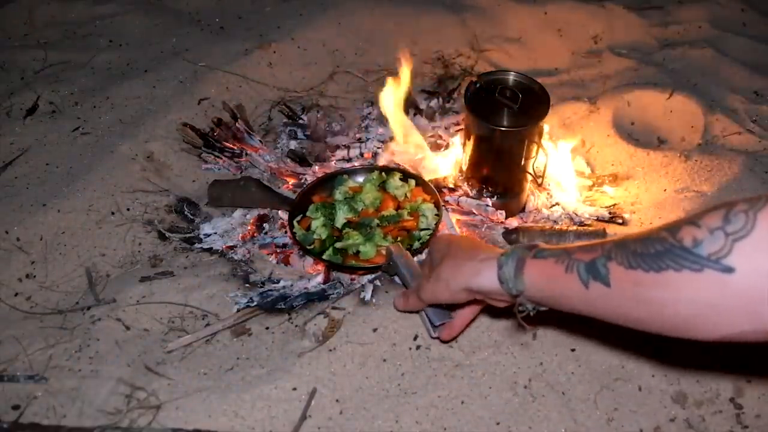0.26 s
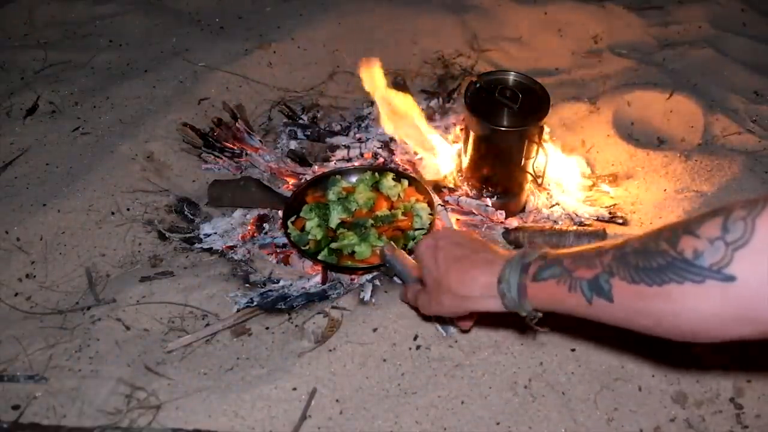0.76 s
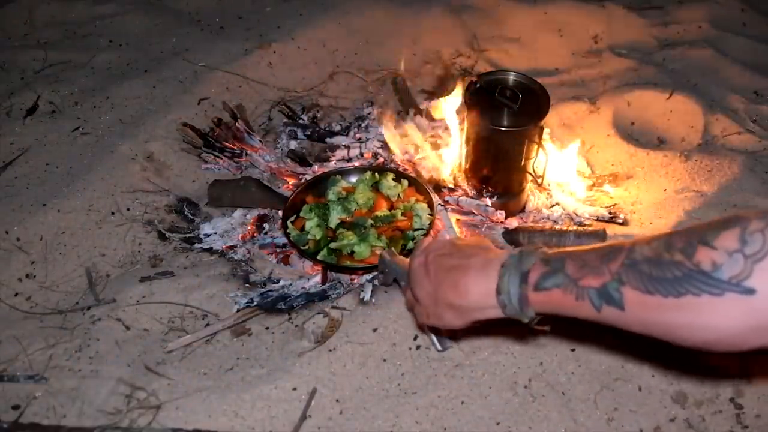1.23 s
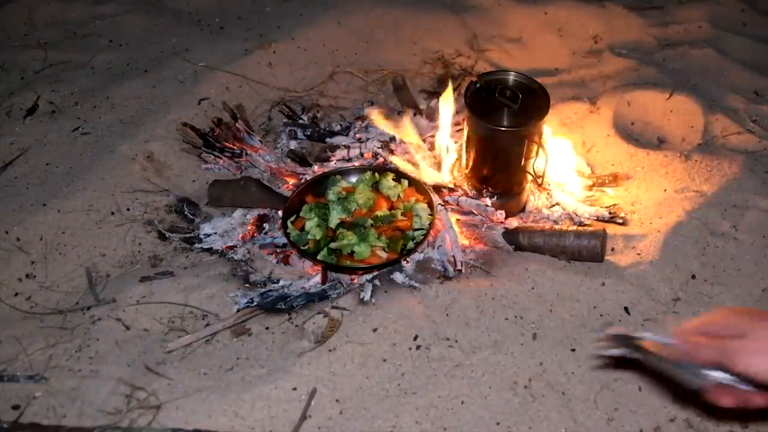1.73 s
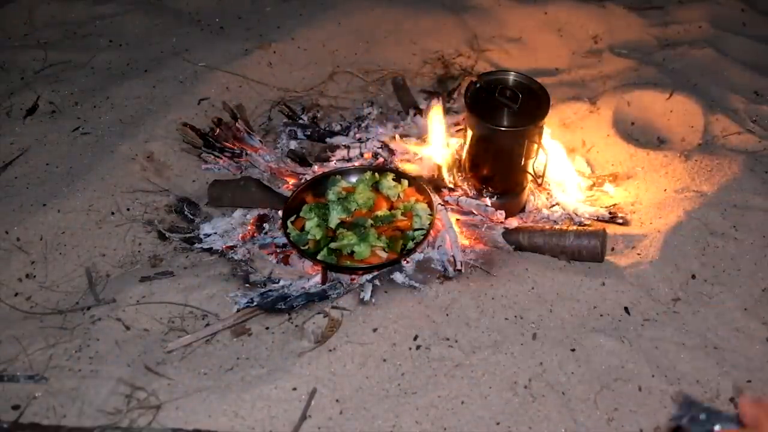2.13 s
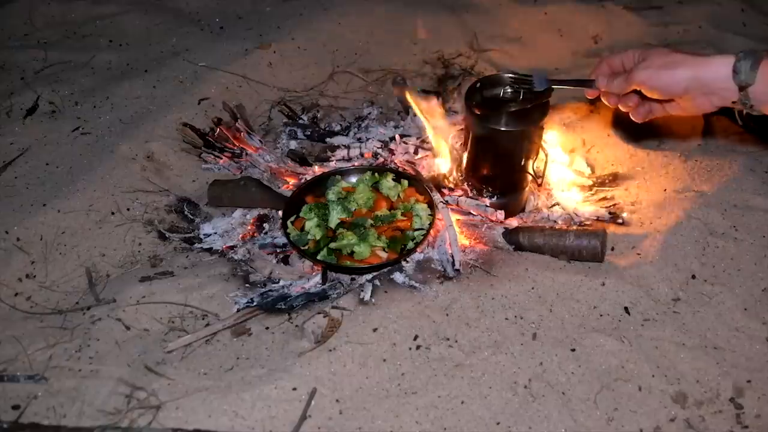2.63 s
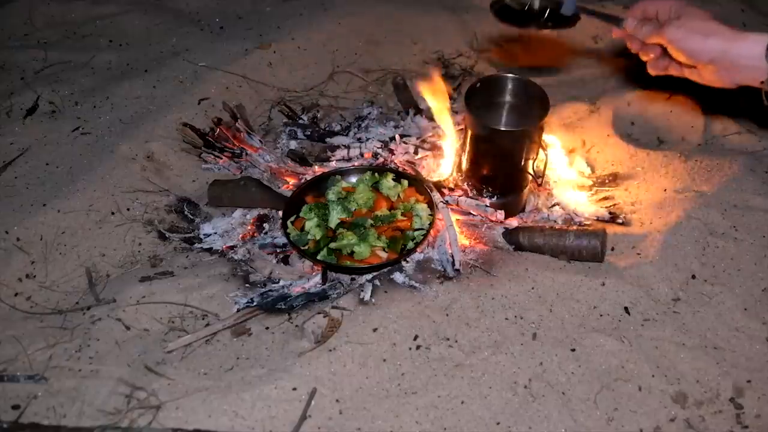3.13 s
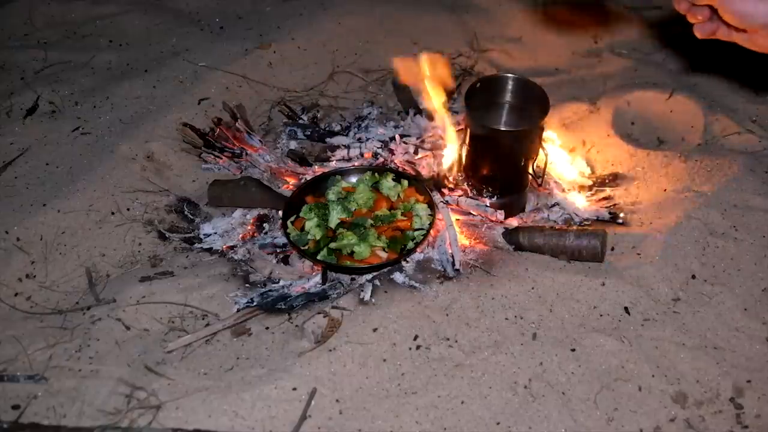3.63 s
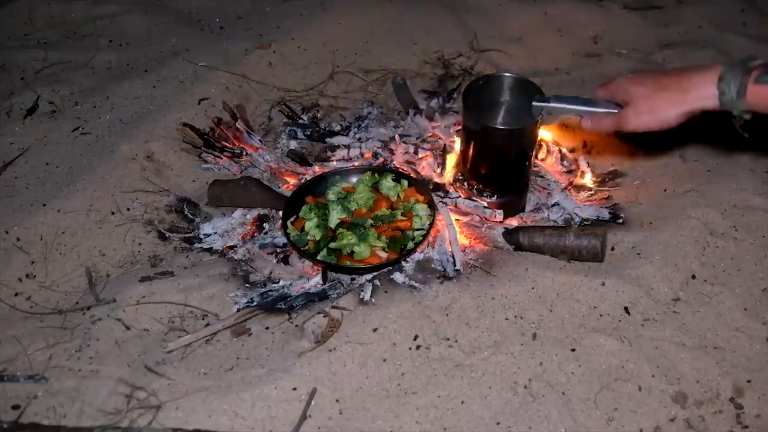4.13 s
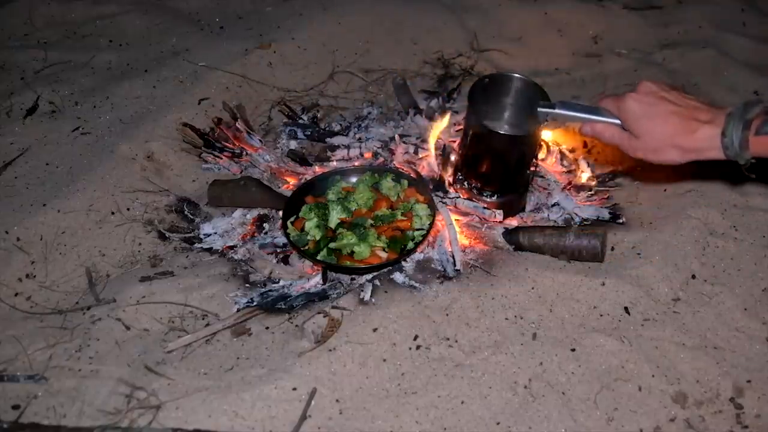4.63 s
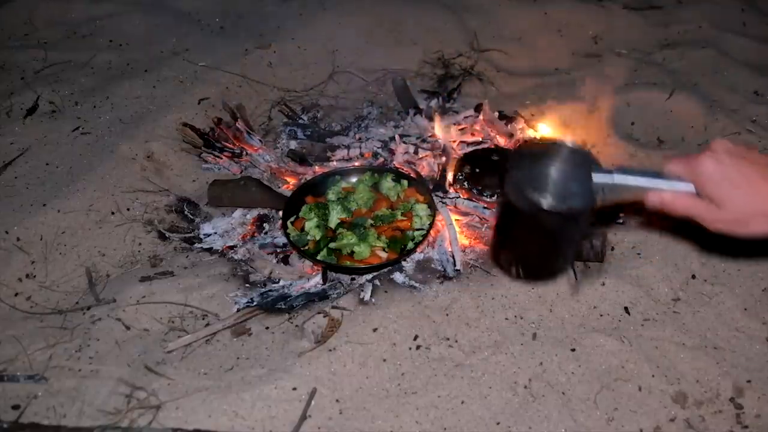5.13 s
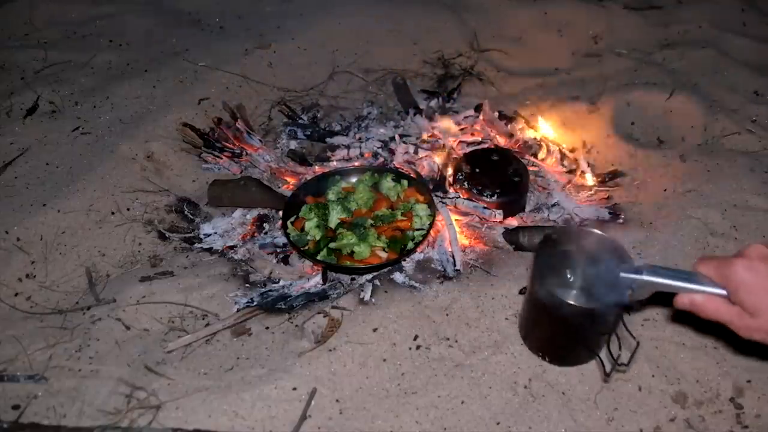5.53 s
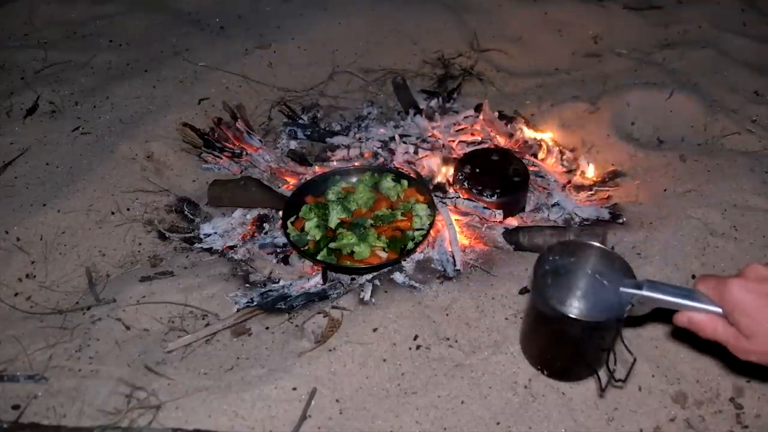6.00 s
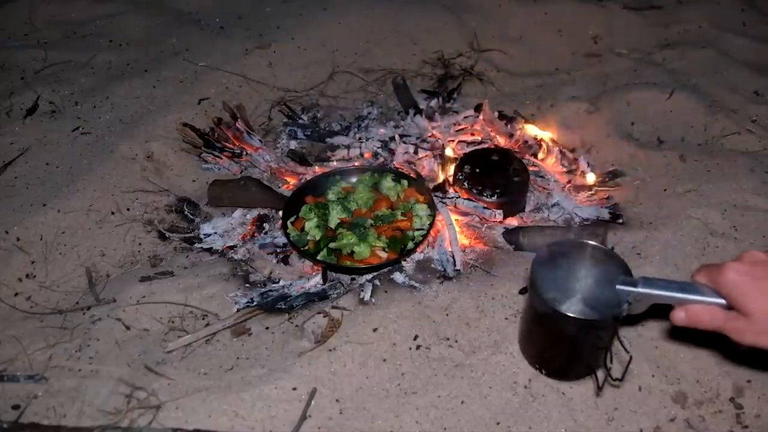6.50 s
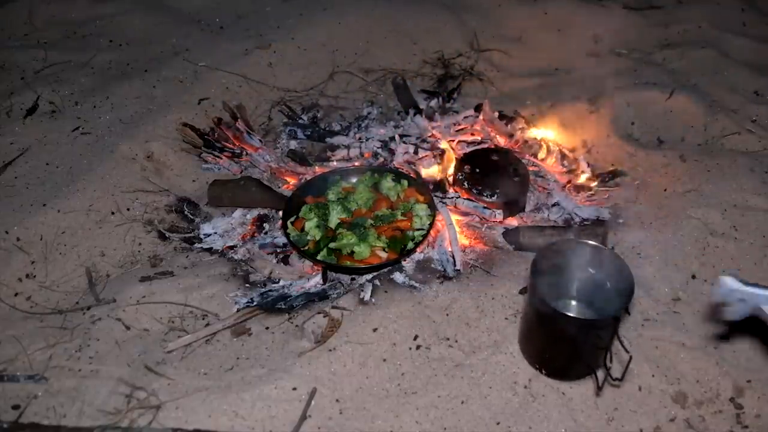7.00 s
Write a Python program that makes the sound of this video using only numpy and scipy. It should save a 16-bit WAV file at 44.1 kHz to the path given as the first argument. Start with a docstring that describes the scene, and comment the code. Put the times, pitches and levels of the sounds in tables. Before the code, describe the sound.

Outdoors at night, close stereo microphones catch low flame flutter, a fast pulsing cricket and distant insects. Vegetables fry very softly while a metal gripper ticks the pan. A brief clinking clamp on a thin lid brings a sudden louder sizzle, which swells again with sharp spits when a full pot is gripped and lifted. The pot lands with short gritty thuds and scrapes in sand, while the sizzle continues.

```python
"""A campfire on sand at night: insects trill, flames flutter and vegetables fry softly in a pan on the coals.
A metal gripper knocks the pan, then lifts the lid off a pot; a louder sizzle starts, which swells and spits
as the pot is gripped and lifted from the fire. The pot is then set down and ground into the sand.
Flames, frying and scraping are shaped noise, knocks and spits are short rings, and the cricket is a
pulsing tone over narrow bands of noise from farther insects."""
import sys
import numpy as np
from scipy import signal
from scipy.fft import rfft, irfft
from scipy.io import wavfile
from scipy.ndimage import uniform_filter1d

SR = 44100
rng = np.random.default_rng(int(sys.argv[2]) if len(sys.argv) > 2 else 0)


def dump_mix(stems):
    """Bounce the given channels to the path in sys.argv[1] as a 16-bit WAV at rate SR."""
    frames = np.atleast_2d(stems).T  # one column per channel
    limited = np.clip(frames, -1, 1)  # hard clip at full scale
    pcm = np.round(limited * 32767).astype(np.int16)
    wavfile.write(sys.argv[1], SR, pcm)


N = 320166
TIME = np.arange(N) / SR  # seconds

# Colour of the flames and night air, before one overall level is set: pitch_hz, level_db
AIR_COLOUR = [(20, -19), (50, -5.5), (110, -1.5), (200, -0.5), (400, -3), (700, -6.5), (1100, -10),
              (1500, -11), (2600, -19.5), (5000, -27.5), (10000, -43), (16000, -41)]
# Extra colour of the left-right difference in that air: pitch_hz, level_db
AIR_SIDE_COLOUR = [(30, -5), (120, -3), (300, -2.5), (800, 3), (2000, 7), (16000, 5)]

# Dull low knocks near 1 kHz; the first goes with a gripper knock on the pan: start_s, peak_db
DULL_KNOCKS = [(1.211, -24.5), (4.4256, -16.5), (7.15, -25.5)]
# Short, broad rings of those knocks: pitch_hz, width_hz, level_db
DULL_KNOCK_MODES = [(764, 220, 0), (1070, 300, 11), (1420, 350, 1), (2300, 750, -23)]

# The pot meeting wood and sand: start_s, level_db, rise_s, decay_s,
# place (0 = thud of its base, 1 = scrape of its edge)
POT_TOUCHES = [(5.584, -22, 0.00073, 0.0051, 0.45), (5.614, -17, 0.0012, 0.0022, 0.3),
               (5.635, -33.5, 0.053, 0.034, .7), (5.93, -26.5, 0.0077, 0.013, 0.6),
               (5.945, -15, 0.0014, 0.0042, 0.38), (5.952, -22.5, 0.003, .005, 0.8),
               (5.9605, -19, 0.0013, 0.0015, 0.73), (5.9865, -22, .0005, 0.011, 1),
               (6.019, -20.5, 0.0063, 0.0078, .65), (6.045, -36, .003, 0.0047, .4),
               (6.301, -27, 0.0022, .003, 0.36), (6.34, -28, 0.026, 0.039, 0.65),
               (6.3637, -14, 0.0012, 0.0035, .02), (6.67, -30, 0.044, 0.072, 0.57)]
# Rings of the full pot, damped by water and sand: pitch_hz, width_hz, base_db, edge_db
POT_MODES = [(345, 180, 0, -25), (1170, 55, -1.5, -16), (1385, 250, 11.5, -2.5), (2940, 270, 1, 6.5),
             (4530, 360, -7, 1), (5100, 340, -14, -15), (6000, 240, -14, -6), (8700, 1300, -16, -27)]
# Hard blows of the full pot that thump the ground: start_s, peak_db
THUMPS = [(5.617, -37), (5.947, -26.5), (6.02, -36), (6.3637, -22)]
# The dead thud of packed sand: pitch_hz, width_hz, level_db
GROUND_MODES = [(150, 120, 4), (343, 220, -5)]

# Gripper on the pan: start_s, level_db, rise_s, decay_s,
# place (0 = dull knock on the wall, 1 = bright slip on the rim)
PAN_TOUCHES = [(.2866, -27.5, 0.00012, 0.0034, 0.019), (.593, -39.5, 0.0019, 0.0042, 0.37),
               (.815, -48, 0.036, 0.014, 1), (.847, -26, 0.00063, 0.003, 0.35),
               (1.140, -27.5, 0.0045, 0.006, 0.49), (1.175, -41, 0.0083, 0.027, 0.85),
               (1.210, -38, 0.0032, 0.0058, 0.057)]
# Rings of the loaded pan: pitch_hz, width_hz, wall_db, rim_db
PAN_MODES = [(744, 140, -6.5, -4), (1090, 180, 1, -10), (1873, 55, 12, -4), (2040, 110, 2, -12),
             (3000, 890, 1, -3), (3670, 200, -1, -21), (4080, 280, -19, -2), (7900, 1100, 3, -2),
             (9800, 530, -20, -10), (11100, 430, -28, -14)]
# Gripper on the lid: start_s, level_db, rise_s, decay_s,
# place (0 = clamped at the edge, 1 = dragged over the pot's lip)
LID_TOUCHES = [(2.3665, -20.5, 0.00023, 0.0043, .02), (2.371, -25.5, 0.0012, 0.0032, .05),
               (2.388, -22, 0.0012, 0.002, .1), (2.398, -23.5, 0.00059, 0.0029, 0.4),
               (2.44, -40.5, 0.039, 0.039, 0.55), (2.477, -33, 0.0011, 0.0031, 0.48),
               (2.487, -29, .002, 0.0083, 0.96), (2.521, -33.5, 0.0017, .003, .8)]
# Rings of the thin steel lid: pitch_hz, width_hz, edge_db, dragged_db
LID_MODES = [(1003, 45, 4, -28), (1080, 54, 8, -27), (1334, 62, -3, -5), (1470, 34, -6, -2),
             (2060, 150, 10.5, -1), (2170, 150, -4, -17), (2520, 25, -8, -13), (2840, 40, 7, -8),
             (2740, 26, -3, -11), (3248, 23, -16, 4), (3376, 15, 6, -7), (3300, 29, -15, -15),
             (4700, 10, -13, -6), (5520, 11, -20, -7), (5550, 10, -22, -7), (5910, 17, -1, -9),
             (7700, 20, -10, -19), (7800, 26, -4, -20), (8830, 7, -26, -8)]

# Sizzle of pan and coals, before a 1 dB cut; it steps up when the lid is clamped
# and again when the pot is gripped: start_s, level_db
SIZZLE_LEVEL = [(0, -53), (1.0, -53.5), (1.6, -56.5), (1.85, -52.5), (2.35, -52.5), (2.39, -42.5),
                (3.1, -43.5), (3.4, -40.5), (4.12, -43.5), (4.14, -38), (4.3, -36.5), (4.55, -38.5),
                (5.15, -34), (5.5, -35.5), (6.0, -34.5), (6.35, -36), (6.65, -34.5), (7.26, -37)]
# Colour of the sizzle, before its treble varies: pitch_hz, level_db
SIZZLE_COLOUR = [(200, -8), (800, -9.5), (1300, -3), (1900, 1), (3000, 1), (4400, -0.5), (5500, -2.5),
                 (6400, -6.5), (7400, -1.5), (9200, 0.5), (10800, -4), (12500, -3), (15700, -11)]
# Treble gain of the sizzle: dullest below the first level, then rising along
# the line through the later points: level_db, treble_db
TREBLE_BY_LEVEL = [(-51, -23), (-57, -11), (-38.5, -1), (-29.5, -1.5)]
# Steps per second, and typical size, of the level surges and the treble wavering
SURGE_PER_S, SURGE_DB = 12, 0.29
WAVER_PER_S, TREBLE_WAVER_DB = 96, 2.0

# The loudest spits of bursting drops, before a 1.5 dB cut: start_s, peak_db, pitch_hz,
# damping (bandwidth over pitch, no unit)
SPITS = [(.3168, -32, 9100, .8), (.6322, -31, 11200, 2.5), (1.3471, -32.5, 7700, .4),
         (2.579, -17, 2800, 1.5), (2.5938, -16, 2500, 2.3), (2.6976, -13, 3280, 0.36),
         (2.9673, -19.5, 3000, 2.3), (3.2534, -12, 4000, 2.3), (3.3016, -16, 2730, 1.9),
         (3.3454, -12.5, 5100, 4.7), (3.4362, -10.5, 4500, 3.2), (3.6778, -16, 3800, 3.8),
         (4.1353, -18, 6300, 3.5), (4.2731, -8.5, 4200, 2.1), (4.3036, -9, 2730, 3.9),
         (4.399, -12.5, 6300, 8.2), (4.7229, -8, 4000, 3.5), (4.7722, -7.5, 5500, 3),
         (4.7945, -7, 3800, 2.3), (4.8913, -14.5, 4640, 2.1), (5.0068, -13, 2800, 1.4),
         (5.0718, -10.5, 3100, 1.5), (5.088, -11, 4200, 3.5), (5.1644, -7, 4500, 1.3),
         (5.17, -12, 3100, 2.1), (5.2131, -11, 3900, 4.4), (5.385, -6, 7440, 10), (5.6215, -4, 5200, 1.9),
         (5.7037, -4.5, 8300, 4.6), (5.7555, -4, 9600, 2.2), (6.076, -12.5, 3400, 2.1),
         (6.426, -14, 7340, 4.2), (6.8352, -6, 6000, 7), (6.9166, -10, 2820, 1.3), (6.9627, -10, 4770, 3.3),
         (7.2253, -7, 3900, 2.3)]
# Lesser spits come more often as the sizzle grows: level_db, rate_per_s
SPIT_RATE_BY_LEVEL = [(-51, .1), (-43.5, 9), (-34, 24)]
# Their peak above the tabled sizzle level, before the same cut, and its range either way
SPIT_OVER_DB, SPIT_RANGE_DB = 20.5, 3.5
# Their middle pitch, its range either way in octaves, and their bandwidth over pitch
SPIT_HZ, SPIT_OCTAVES, SPIT_DAMPING = 4500, 1.17, 1.85
# Left minus right of all spits, and its spread from drop to drop
SPIT_PAN_DB, SPIT_PAN_SPREAD_DB = 0.5, 3

# Width heard by the microphone pair: pitch_hz, side_db (gain of the left-right difference)
MIC_WIDTH = [(100, 1.5), (300, -0.5), (600, -3.5), (1400, -9.5), (2400, -8), (4500, -1), (15000, -0.5)]
# Left minus right of the microphone pair: pitch_hz, difference_db
MIC_BALANCE = [(2400, 0), (5000, 1), (9000, 1.5), (12500, -0.5)]
TOP_HZ = 15900  # the recorder's upper limit


def undb(db):
    """Turn decibels into a gain."""
    return 10 ** (np.asarray(db) / 20)


def unit(x):
    """Scale a sound to an average strength (rms) of 1."""
    return x / np.sqrt(np.mean(x ** 2))


def follow(x, points):
    """Read a table of (x, y) points joined by straight lines."""
    return np.interp(x, *np.transpose(points))


def walk(rate):
    """Wander randomly: `rate` new levels a second, smoothed twice, with an rms near 1."""
    hold = max(int(SR / rate), 2)
    steps = np.repeat(rng.standard_normal(N // hold + 1), hold)
    smooth = uniform_filter1d(uniform_filter1d(steps, hold), hold)
    return unit(smooth[:N])


def convolve(x, response):
    """Start one copy of the response at every sample of the sound; rows are channels."""
    return signal.fftconvolve(np.atleast_2d(x), np.atleast_2d(response), axes=1)[:, :x.shape[-1]]


def colour(x, points):
    """Make pitches louder or softer through (Hz, dB) points, without any sound ahead of time."""
    hz, db = np.transpose(points)
    size = 4096
    bin_hz = np.arange(size // 2 + 1) * SR / size
    log_gain = np.log(undb(np.interp(np.log(bin_hz + 1), np.log(hz), db)))
    # folding the cepstrum forward in time gives the filter that answers soonest
    cepstrum = irfft(log_gain)
    cepstrum[1:size // 2] *= 2
    cepstrum[size // 2 + 1:] = 0
    return convolve(x, irfft(np.exp(rfft(cepstrum))))


def high_pass(x, hz, order=2):
    """Cut the low pitches gently."""
    return signal.sosfilt(signal.butter(order, hz, "high", fs=SR, output="sos"), x)


def band(x, hz, width_hz):
    """Keep the pitches around one resonance, with gain 1 at its centre."""
    g, k = np.tan(np.pi * hz / SR), width_hz / hz
    top = [g * k, 0, -g * k]
    bottom = [1 + g * k + g * g, 2 * (g * g - 1), 1 - g * k + g * g]
    return signal.lfilter(top, bottom, x)


def stereo(pair, side_db):
    """Use two unrelated sounds as the middle and the left-right difference."""
    return pair[0] + undb(side_db) * pair[1] * np.array([[1], [-1]])


def panned(db):
    """Give left and right gains for a level difference."""
    return undb(np.array([[db], [-db]]) / 2)


def ring(x, modes):
    """Ring a body of (Hz, width Hz, dB) modes; wider modes die sooner, white noise keeps its level."""
    t = TIME[:SR // 2]
    response = 0
    for hz, width, db in modes:
        fade = np.exp(-np.pi * width * t)
        response = response + undb(db) * np.sqrt(width) * fade * np.cos(2 * np.pi * hz * t)
    # a small body radiates little below its lowest mode
    response = high_pass(response, .8 * modes[0][0])
    return convolve(x, response / np.linalg.norm(response))


def strike(blows, modes):
    force = np.zeros(N)
    for start_s, peak_db in blows:
        force[int(start_s * SR)] += undb(peak_db)
    sound = ring(force, modes)
    return sound / np.abs(sound).max() * force.max()


def contact(start_s, level_db, rise_s, decay_s):
    """Shape the force of one touch: it builds up, then dies away."""
    t = TIME - start_s
    fall = np.where(t < 0, (t / rise_s) ** 2, t / decay_s)
    return undb(level_db) * np.exp(-np.minimum(fall, 60))


def grit(spread_db):
    """Make dense tiny slips of uneven size under a steady push, in two unrelated rows."""
    slips = rng.standard_normal((2, N)) * undb(spread_db * rng.standard_normal(N))
    # evening out over 2 ms keeps the push steady
    return slips / np.sqrt(uniform_filter1d(slips ** 2, size=90))


def touch(touches, modes, grain_db, soft_hz, side_db):
    """Ring a metal body through tiny slips; the place of contact decides which modes answer."""
    forces = np.array([contact(*row[:4]) for row in touches])
    place = np.array([row[4] for row in touches])
    slips = grit(grain_db)
    # a broad, blunt contact pushes too slowly to reach the highest pitches
    blunt = signal.sosfilt(signal.butter(2, soft_hz, fs=SR, output="sos"), slips)
    dull_modes = [(hz, width, db) for hz, width, db, _ in modes]
    bright_modes = [(hz, width, db) for hz, width, _, db in modes]
    dull = ring((1 - place) @ forces * blunt, dull_modes)
    bright = ring(place @ forces * slips, bright_modes)
    return stereo(dull + bright, side_db)


def burst(hz, damping, scatter_db, scatter_s):
    """Burst one drop: a snap of a cycle or two, scattered differently to each ear by wood and pan."""
    t = TIME[:SR // 80]
    scatter = rng.standard_normal((2, len(t))) * np.exp(-t / scatter_s) * undb(scatter_db)
    click = (t == 0) + scatter
    snap = band(band(click, hz, hz * damping), hz, hz * damping)
    return high_pass(snap, 700)


def air():
    """Low flutter of the flames in open night air: coloured noise whose level wavers slightly."""
    mid, side = colour(rng.standard_normal((2, N)), AIR_COLOUR)
    sound = stereo([mid, colour(side, AIR_SIDE_COLOUR)[0]], side_db=1.5)
    return unit(sound) * undb(-47.5 + 0.36 * walk(5.9))


def tone_noise(hz, width_hz):
    """A pitch blurred by many callers and by distance, as two unrelated rows of narrow noise."""
    return unit(band(band(rng.standard_normal((2, N)), hz, width_hz), hz, width_hz))


def insects():
    """A cricket trills by fast wing strokes, a far chorus swells evenly, a high buzz rises for a second."""
    beat = 14.2 * TIME + 0.17 * walk(4.9)  # wing strokes so far, slightly uneven
    stroke = (.5 + .5 * np.cos(2 * np.pi * beat)) ** 6.1
    # the pitch sags through each wing stroke
    pitch_hz = 2030 - 18 * np.sin(2 * np.pi * beat) + 8 * walk(40)
    tone = np.sin(2 * np.pi * np.cumsum(pitch_hz) / SR)
    trill = undb(-49.5) * stroke * undb(2 * walk(9.4)) * tone
    swell = np.cos(2 * np.pi * (TIME - .1) / .258)  # one swell every 0.258 s
    chorus = tone_noise(1898, 156) * undb(-55.5 + 3.0 * swell)
    far = tone_noise(2027, 310) * undb(-57.5) + tone_noise(5080, 700) * undb(-69.5)
    buzz_db = np.interp(TIME, [.5, .7, 1.55, 1.8], [-77.0, -71, -71, -77])
    buzz = tone_noise(6580, 300) * undb(buzz_db)
    return trill + stereo(chorus + far + buzz, side_db=4)


def charcoal():
    """Charcoal grates under the sliding pan: many tiny slips ring broad, short modes."""
    push = contact(start_s=0.392, level_db=-45, rise_s=0.037, decay_s=0.034)
    charcoal_modes = [(2380, 1300, 11), (3500, 430, 12.0), (4150, 460, -20)]  # Hz, width Hz, dB
    slide = ring(push * grit(spread_db=-1), charcoal_modes)
    return stereo(band(slide, 3500, 8200), side_db=-13)


def dull_knocks():
    """Single blows ring broad modes near 1 kHz that die at once."""
    return strike(DULL_KNOCKS, DULL_KNOCK_MODES)


def pot():
    """Sand grinds under the pot and rings its wall; hard blows also thump the ground."""
    grinding = touch(POT_TOUCHES, POT_MODES, grain_db=3, soft_hz=7140, side_db=-3)
    return grinding + strike(THUMPS, GROUND_MODES)


def gripper():
    """Steel jaws knock the pan, then clamp the lid; each rings at its own pitches."""
    pan = touch(PAN_TOUCHES, PAN_MODES, grain_db=7.5, soft_hz=5500, side_db=-6)
    lid = touch(LID_TOUCHES, LID_MODES, grain_db=0.5, soft_hz=8200, side_db=-6)
    return pan + lid


def bubbles(flurry, sizes=16):
    """Thousands of tiny bubbles of many sizes burst at random, more often in a flurry."""
    crackle = 0
    for k, hz in enumerate(np.geomspace(2200, 13000, sizes)):
        chance, strength = rng.random(N), rng.exponential(size=N)
        # about 110 bursts a second for each size
        pops = (chance < 110 * flurry / SR) * undb(5.2 * np.minimum(strength, 4.5))
        side = 1.5 * (-1) ** k  # sizes lean left and right in turn, in dB
        shape = burst(hz, damping=1.4, scatter_db=-17, scatter_s=.0008) * panned(side)
        crackle = crackle + convolve(pops, shape)
    return crackle


def sizzle():
    """Bursting bubbles over a fine steam hiss, in quick flurries, with surging level and wavering treble."""
    level_db = follow(TIME, SIZZLE_LEVEL) + SURGE_DB * walk(SURGE_PER_S)
    treble_db = follow(level_db, TREBLE_BY_LEVEL) + TREBLE_WAVER_DB * walk(WAVER_PER_S)
    flurry = undb(1.8 * walk(45))
    crackle = bubbles(flurry)
    hiss = stereo(rng.standard_normal((2, N)), side_db=-4) * np.sqrt(flurry)
    # a gentle fry is mostly hiss; the fiercer it is, the more it crackles, up to a limit
    crackle_db = np.minimum(0.65 * (level_db + 27.5), 2)
    mix = unit(crackle) * undb(crackle_db) + undb(-6) * unit(hiss)
    sound = colour(mix, SIZZLE_COLOUR)
    treble = high_pass(sound, 6700, order=1)
    sound = high_pass(sound + (undb(treble_db) - 1) * treble, 190)
    return unit(sound) * undb(level_db - 1.0)


def lesser_spits(count=400):
    """Drops burst at random, more often and harder in a fierce sizzle; rows like those of SPITS."""
    slot_s = N / SR / count  # each short slot of time may hold one spit
    chance, when, size, pitch = rng.random((count, 4)).T
    start_s = (np.arange(count) + when) * slot_s
    level_db = follow(start_s, SIZZLE_LEVEL)
    peak_db = level_db + SPIT_OVER_DB + SPIT_RANGE_DB * (2 * size - 1)
    hz = SPIT_HZ * 2 ** (SPIT_OCTAVES * (2 * pitch - 1))
    rows = np.column_stack([start_s, peak_db, hz, np.full(count, SPIT_DAMPING)])
    return list(rows[chance < follow(level_db, SPIT_RATE_BY_LEVEL) * slot_s])


def spits():
    """Single large drops explode above the sizzle, each as a short snap at its own pitch."""
    out = np.zeros((2, N + SR))  # spare room for the last snap
    for start_s, peak_db, hz, damping in list(SPITS) + lesser_spits():
        snap = burst(hz, damping, scatter_db=-13.5, scatter_s=0.00081)
        snap = snap / np.abs(snap.mean(axis=0)).max()
        pan_db = SPIT_PAN_DB + SPIT_PAN_SPREAD_DB * rng.standard_normal()
        start = int(start_s * SR)
        out[:, start:start + snap.shape[1]] += snap * undb(peak_db - 1.5) * panned(pan_db)
    return out[:, :N]


def scene():
    """Add up everything around the fire."""
    background = air() + insects() + charcoal() + dull_knocks()
    return background + pot() + gripper() + sizzle() + spits()


def record(dry):
    """Two close microphones hear the mids alike and the treble apart; the recorder cuts the top."""
    mid, side = (dry[0] + dry[1]) / 2, (dry[0] - dry[1]) / 2
    side = colour(side, MIC_WIDTH)[0]
    hz, db = np.transpose(MIC_BALANCE)
    left = colour(mid + side, np.transpose([hz, db / 2]))
    right = colour(mid - side, np.transpose([hz, -db / 2]))
    top_cut = signal.ellip(10, .2, 70, TOP_HZ, fs=SR, output="sos")
    return signal.sosfilt(top_cut, np.vstack([left, right]))


dry = scene()
out = record(dry)
dump_mix(out)
```